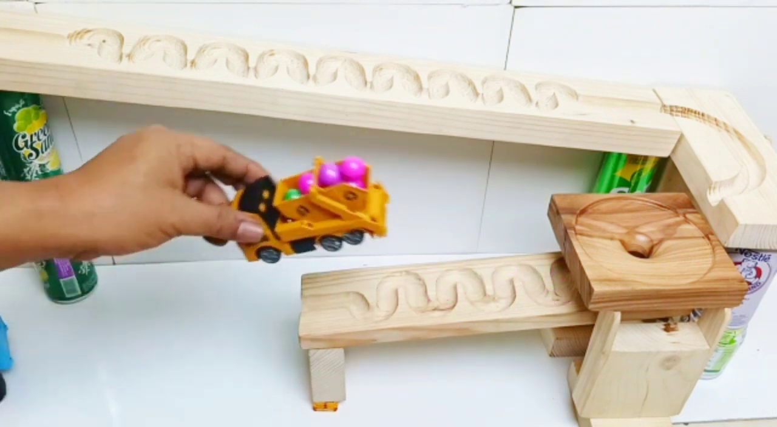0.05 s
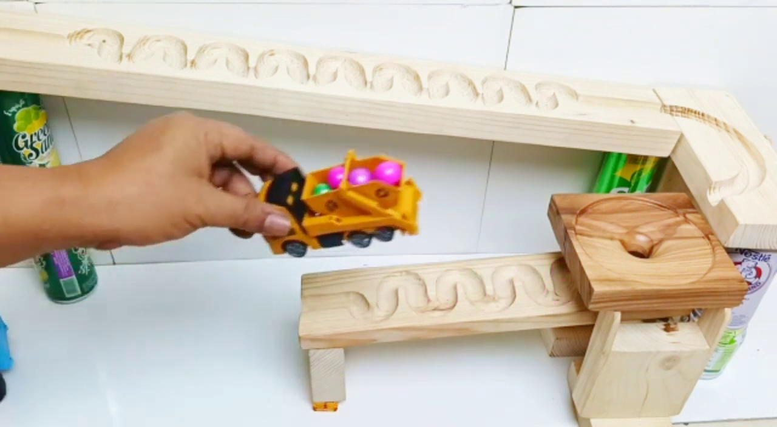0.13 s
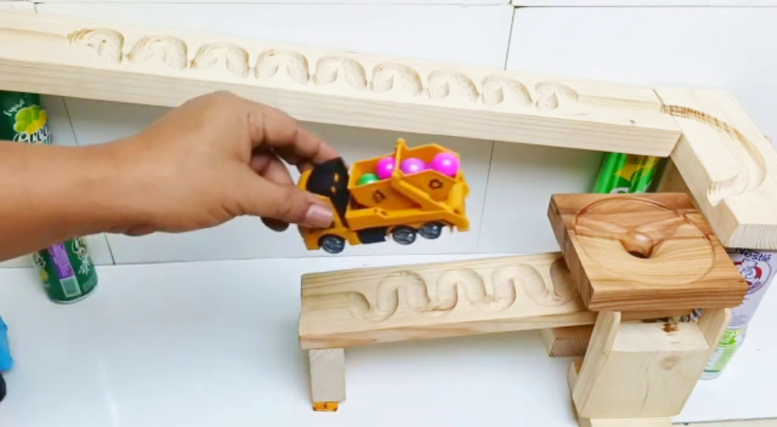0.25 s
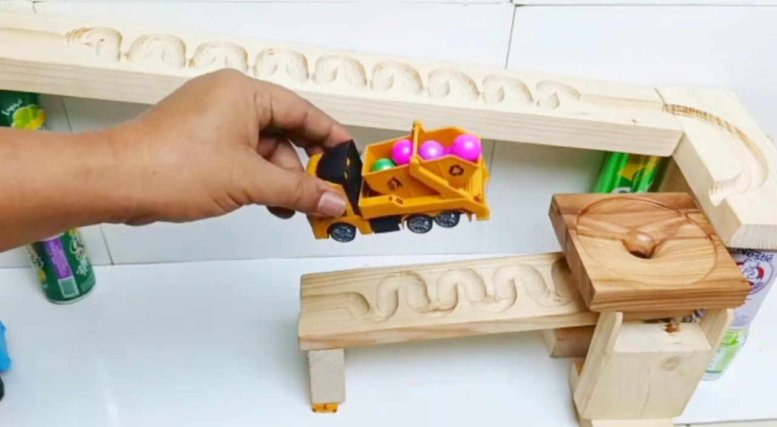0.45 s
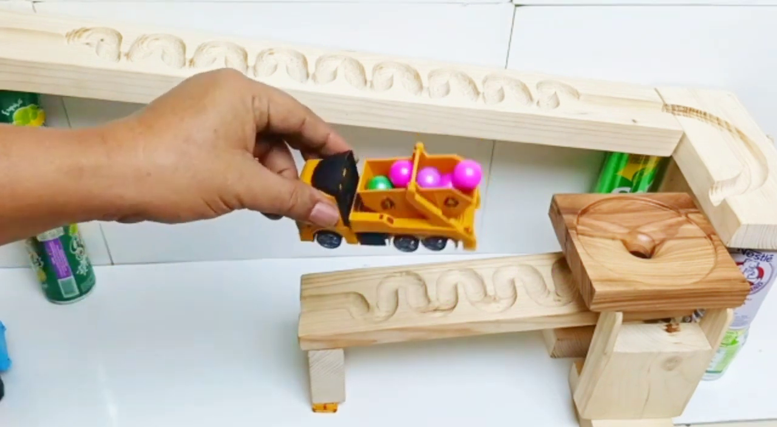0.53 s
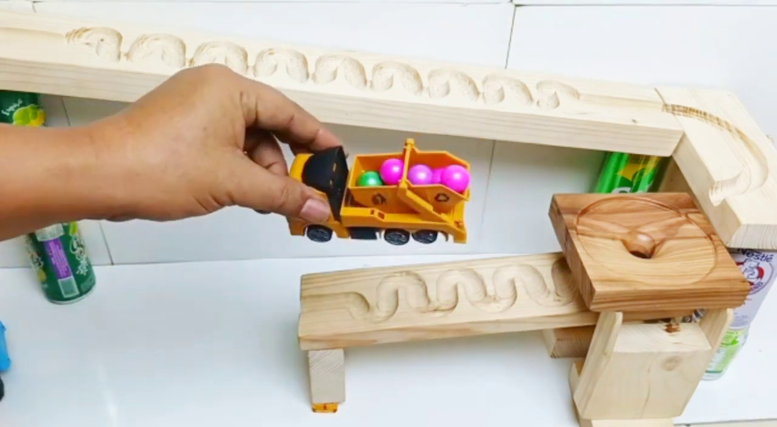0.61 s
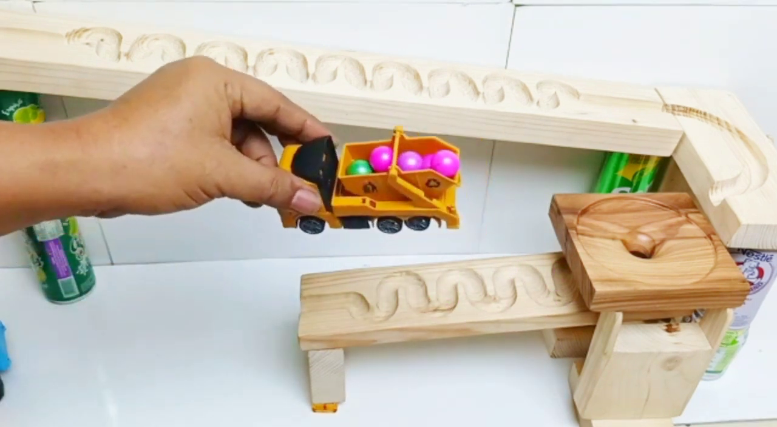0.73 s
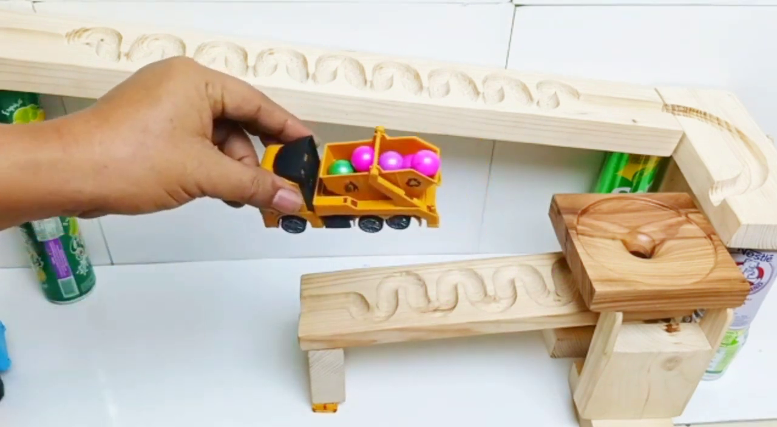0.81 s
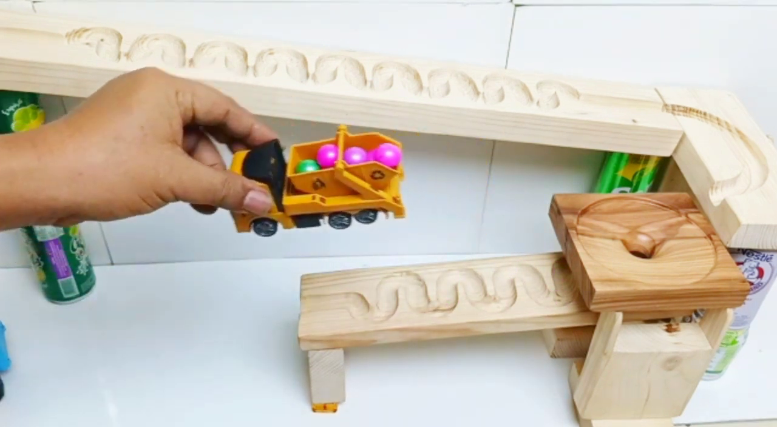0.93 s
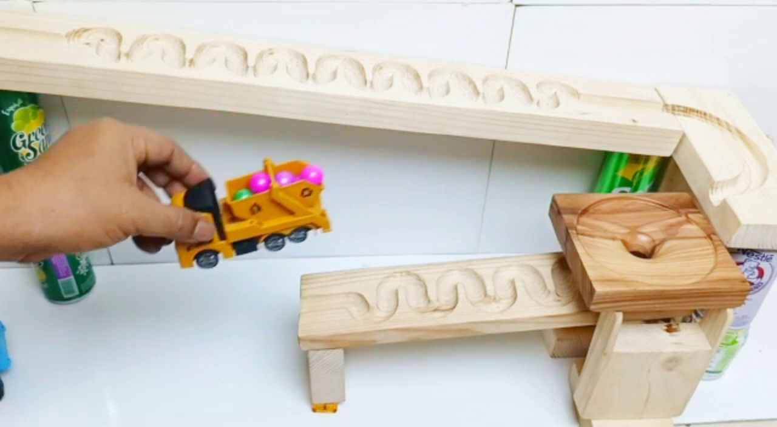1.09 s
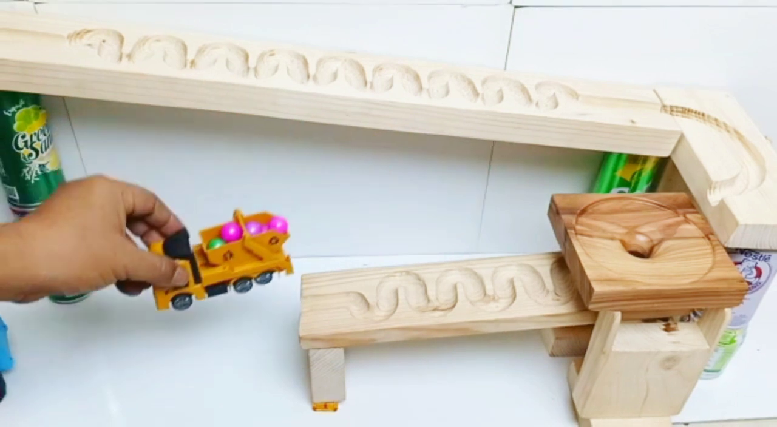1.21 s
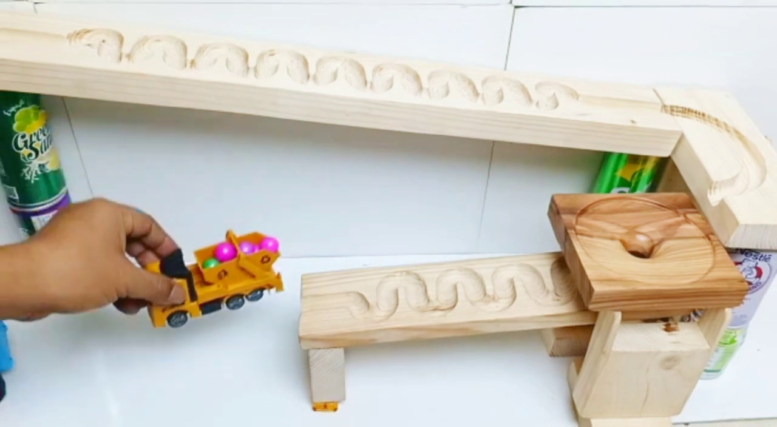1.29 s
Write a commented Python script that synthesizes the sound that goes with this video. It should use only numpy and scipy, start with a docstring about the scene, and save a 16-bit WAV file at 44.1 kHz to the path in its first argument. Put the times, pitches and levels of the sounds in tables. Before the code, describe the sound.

Marbles clack and tick in the plastic bed of a toy truck in two quick flurries as a hand tilts it. Muffled handling noise and soft bumps sit underneath, and the clacks ring on in a reverberant room.

```python
"""Two flurries of plastic clacks, carried on in a long, wide reverberation.
Marbles knock about in the bed of a toy truck that a hand tilts to and fro;
each contact ticks and rings the plastic. Under them muffled handling noise
swells and fades, with soft bumps of the hand, over faint room noise."""
import sys
import numpy as np
from scipy import signal
from scipy.fft import irfft
from scipy.io import wavfile

SR = 44100
rng = np.random.default_rng(int(sys.argv[2]) if len(sys.argv) > 2 else 0)


def digitize_waveform(pressure):
    """Quantize a signal to 16-bit integers and store it at the path in sys.argv[1].

    Rows of a 2-D input are taken as channels; values are limited to [-1, 1].
    """
    field = np.atleast_2d(pressure).T
    bounded = np.clip(field, -1, 1)
    quanta = np.round(bounded * 32767).astype(np.int16)
    wavfile.write(sys.argv[1], SR, quanta)


N = 59535
CONTACT_S = 0.00063


def clacks():
    """Each marble contact gives a bright tick and briefly rings the plastic bed."""
    # Contacts: t/s, knock level/dB, relative tick level/dB, hollow-mode boost/dB
    contacts = [(0.232, -30, -29, -8), (0.2333, -29.5, -34.5, -15.5), (0.2359, -33, -36, -2.5),
                (0.2479, -27.5, -40, -1), (0.2495, -28, -32.5, 1), (0.2525, -26, -40, 2.5),
                (0.2544, -32.5, -33.5, 0), (0.2767, -39.5, -51, 8), (0.281, -31.5, -39, 6),
                (0.2834, -30.5, -32.5, 0.5), (0.2851, -23.5, -23, -3), (0.2848, -27.5, -32.5, 4),
                (0.2894, -36, -31.5, 5.5), (0.2982, -32.5, -40.5, 7), (0.3099, -33, -40, 3),
                (0.323, -47.5, -40, -2), (.3450, -46, -44, -3), (0.376, -38.5, -62, -10),
                (0.382, -46, -54, -7.5), (0.4419, -48, -42.5, -12), (0.4469, -40, -46, -8),
                (0.6483, -31, -50, -4.5), (0.6506, -40.5, -40.5, -3.5), (0.6964, -46.5, -44, -4),
                (.7000, -46.5, -37.5, -11), (0.7097, -30, -34, -1), (0.7109, -30, -39.5, -11.5),
                (0.7155, -42.5, -40.5, 1), (0.7324, -36, -51, 6), (.7405, -36, -33.5, 3),
                (0.7483, -40, -46, 4.5), (1.306, -55.5, -67.5, 0)]
    # Truck bed modes: f/Hz, relative level/dB, t60/s
    bed_modes = [(878, -23.5, 0.033), (1280, -19.5, 0.053), (1505, -12.5, 0.034), (1828, -18.5, 0.048),
                 (2504, -5, 0.038), (2664.5, 2.5, 0.027), (2892, 0, 0.025), (3199, -6, 0.027),
                 (3615, -14.5, 0.032), (4040, -17, .01), (4510, -17.5, .012)]
    # Tick spectrum: f/Hz, relative level/dB
    tick_spectrum = [(300, -37.5), (900, -23), (2000, 0.5), (4600, -1), (5500, -7.5), (6700, -14),
                     (7900, -5.5), (8600, -3.5), (9600, 1.5), (10600, -4), (12000, -18.5), (16000, -23)]
    hollow_below_hz, scatter_db, detune = 2250, 2.5, .012
    tick_t60_s, tick_gain_db = 0.015, -7
    out, t = np.zeros(N), np.arange(4096) / SR
    hz, mode_db, t60_s = np.transpose(bed_modes)[:, :, None]
    onset = 1 - np.exp(-(t / CONTACT_S) ** 2)
    for start_s, knock_db, tick_db, hollow_db in contacts:
        struck_db = mode_db + hollow_db * (hz < hollow_below_hz)
        strength = amp(struck_db + scatter_db * rng.standard_normal(hz.shape))
        struck_hz = hz * (1 + detune * rng.standard_normal(hz.shape))
        modes = strength * decay(t, t60_s) * np.sin(2 * np.pi * struck_hz * t)
        knock = onset * modes.sum(0) / np.linalg.norm(strength)
        tick = noise(tick_spectrum, len(t)) * decay(t, tick_t60_s)
        add(out, start_s, amp(knock_db) * knock + amp(tick_db + tick_gain_db) * tick)
    return out


def pings():
    """Some contacts leave a thin ping."""
    # Pings: t/s, level/dB, f/Hz, t60/s
    tones = [(.2322, -35.5, 4615, .03), (.2322, -38, 7750, .018), (.7405, -45, 3592, 0.062),
             (1.306, -61, 5730, 0.013)]
    return damped_tones(tones, rise_s=CONTACT_S)


def hand_bumps():
    """The hand bumps softly on the toy."""
    # Bumps: t/s, level/dB, f/Hz, t60/s
    bumps = [(.14, -49, 157, 0.048), (.375, -46, 97, .12), (.468, -69, 199, .08), (.486, -41, 119, 0.081),
             (.522, -44, 112.7, .06), (.569, -46, 308.8, 0.075), (.752, -38, 232.6, 0.047),
             (.795, -46.5, 88, 0.15), (1.255, -48, 780, .012), (1.31, -45.5, 106.3, 0.074)]
    return damped_tones(bumps, rise_s=.003)


def handling_rumble():
    """Muffled handling noise that gains body as it swells."""
    # Swell: t/s, level before gains/dB
    swell = [(0, -53), (0.079, -54.5), (.19, -67.5), (.28, -62), (.34, -69), (0.391, -49.5), (.445, -54),
             (.48, -41.5), (.54, -44), (0.609, -55.5), (0.711, -57.5), (.76, -51.5), (0.811, -52.5),
             (0.891, -65), (1.02, -64.5), (1.07, -61), (1.13, -73.5), (1.262, -68.5), (1.32, -59),
             (1.35, -68.5)]
    # Rumble spectrum: f/Hz, relative level/dB
    rumble_spectrum = [(25, -26), (50, -7), (75, -3.5), (105, 1), (160, -3), (230, -11), (320, -23.5),
                       (420, -37), (700, -67.5)]
    # Body spectrum: f/Hz, relative level/dB
    body_spectrum = [(60, -39), (120, -9.5), (170, 2), (240, -4.5), (320, -9), (400, -25), (500, -43.5),
                     (700, -67)]
    rumble_gain_db, body_gain_db = -5, -8
    pivot_db, body_db_per_db = -46, 1.56
    swell_db = envelope_db(swell)
    body_db = pivot_db + body_db_per_db * (swell_db - pivot_db)
    rumble = amp(swell_db + rumble_gain_db) * noise(rumble_spectrum, N)
    body = amp(body_db + body_gain_db) * noise(body_spectrum, N)
    return rumble + body


def room(direct):
    """Adds quick echoes off nearby surfaces, then a long, wide reverberation."""
    # Late decay: f/Hz, t60/s
    late_t60 = [(100, 1.15), (1400, 2.5), (2700, 1.5), (4500, 1.07), (7000, 0.88), (10000, 0.6),
                (15000, 0.36)]
    # Late colour: f/Hz, relative level/dB
    late_colour = [(100, -3), (400, -3), (900, -2.5), (1450, -1), (2100, -6), (2650, -1.5), (3200, -4.5),
                   (4600, -4.5), (7000, -8.5), (10000, -7.5), (15000, -9)]
    near_db, near_t60_s, late_db = -4, .18, -7.5
    near = reflections(delay_s=.004, t60=[(1, near_t60_s)], colour=[(1, 0)])  # flat spectrum
    mid, side = [reflections(delay_s=.04, t60=late_t60, colour=late_colour) for _ in range(2)]
    response = amp(near_db) * near + amp(late_db) * stereo(mid, side, width=0.83)
    return direct + signal.fftconvolve(direct[None], response, axes=1)[:, :N]


def reflections(delay_s, t60, colour, slot_samples=16):
    """Sparse echoes of random sign, each band dying at its own rate."""
    taps = np.zeros(N)
    slots = np.arange(0, N - slot_samples, slot_samples)
    taps[slots + rng.integers(0, slot_samples, len(slots))] = rng.choice([-1., 1.], len(slots))
    hz, t, bands = signal.stft(taps, SR, nperseg=256)
    bands = bands * decay(t, at_hz(t60, hz)[:, None])
    bands = bands / np.linalg.norm(bands, axis=1, keepdims=True).clip(1e-9)
    flat_norm = np.linalg.norm(signal.istft(bands, SR)[1])
    tail = signal.istft(bands * amp(at_hz(colour, hz))[:, None], SR)[1] / flat_norm
    out = np.zeros(N)
    add(out, delay_s, tail)
    return out


def room_noise():
    """A low, wide drone that dies down, and faint steady hiss."""
    # Drone envelope: t/s, level/dB
    drone_level = [(0, -57.5), (.3, -70.5), (1.35, -75)]
    # Drone spectrum: f/Hz, relative level/dB
    drone_spectrum = [(25, -23), (50, -10), (80, 1.5), (160, 1), (250, -11), (330, -14.5), (450, -36),
                      (700, -67)]
    # Hiss spectrum: f/Hz, relative level/dB
    hiss_spectrum = [(30, -10), (300, 2.5), (500, -0.5), (800, -2), (1400, -6), (2200, -8), (3000, -9),
                     (4200, -23.5), (6500, -29), (9500, -24.5), (12000, -31.5), (16000, -22)]
    hiss_db = -76
    drone = stereo(noise(drone_spectrum, N), noise(drone_spectrum, N), width=0.78)
    hiss = stereo(noise(hiss_spectrum, N), noise(hiss_spectrum, N), width=0.23)
    return amp(envelope_db(drone_level)) * drone + amp(hiss_db) * hiss


def damped_tones(table, rise_s):
    """One damped sine per row."""
    out, t = np.zeros(N), np.arange(SR // 2) / SR
    onset = 1 - np.exp(-t / rise_s)
    for start_s, db, hz, t60_s in table:
        add(out, start_s, amp(db) * onset * decay(t, t60_s) * np.sin(2 * np.pi * hz * t))
    return out


def noise(spectrum, size):
    """Random-phase noise of given spectrum, rms 1."""
    hz = np.fft.rfftfreq(size, 1 / SR)
    phasors = np.exp(2j * np.pi * rng.random(len(hz)))
    x = irfft(phasors * amp(at_hz(spectrum, hz)), size)
    return x / np.sqrt(np.mean(x ** 2) + 1e-20)


def amp(db):
    """dB to gain."""
    return 10 ** (np.asarray(db) / 20)


def decay(t, t60_s):
    """Exponential fall, 60 dB per t60_s."""
    return np.exp(-np.log(1000) * t / t60_s)


def envelope_db(points):
    """Level per sample from (t/s, level/dB) points."""
    return np.interp(np.arange(N) / SR, *np.transpose(points))


def at_hz(points, hz):
    """Table lookup on a log-frequency axis."""
    point_hz, value = np.transpose(points)
    return np.interp(np.log(hz + 1), np.log(point_hz + 1), value)


def add(mix, start_s, sound):
    """Mixes a sound in at start_s."""
    part = mix[max(round(start_s * SR), 0):][:len(sound)]
    part += sound[:len(part)]


def stereo(mid, side, width):
    """Mid/side to left/right."""
    return np.array([mid + width * side, mid - width * side])


def scene():
    """Centred marble and handling sounds given a long, wide reverberation, over faint background noise."""
    return room(clacks() + pings() + handling_rumble() + hand_bumps()) + room_noise()


def record(dry):
    """Fade-in and low-pass."""
    fade_in_s, cutoff_hz = .004, 16100
    eased = dry * np.minimum(np.arange(N) / SR / fade_in_s, 1)
    lowpass_taps = signal.firwin(511, cutoff_hz, window=("kaiser", 9), fs=SR)
    return signal.oaconvolve(eased, lowpass_taps[None], "same")


dry = scene()
out = record(dry)
digitize_waveform(out)
```